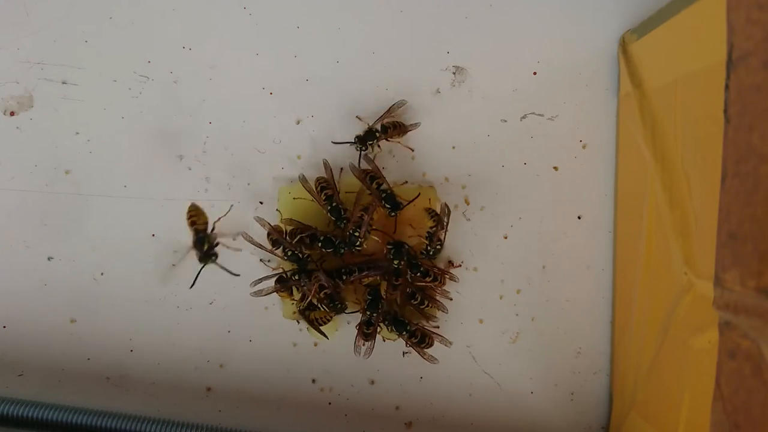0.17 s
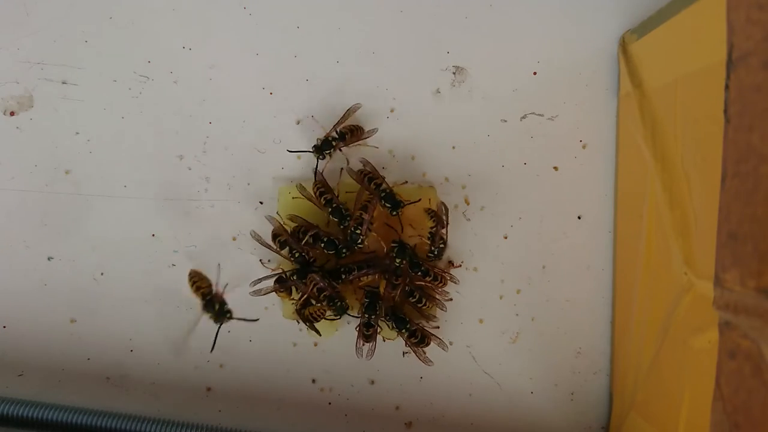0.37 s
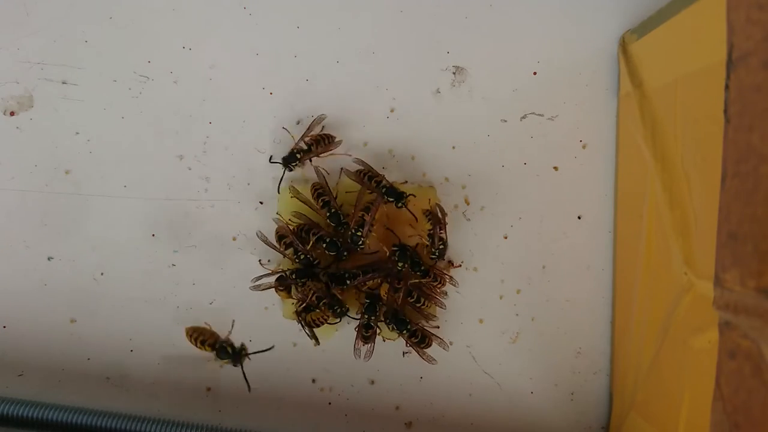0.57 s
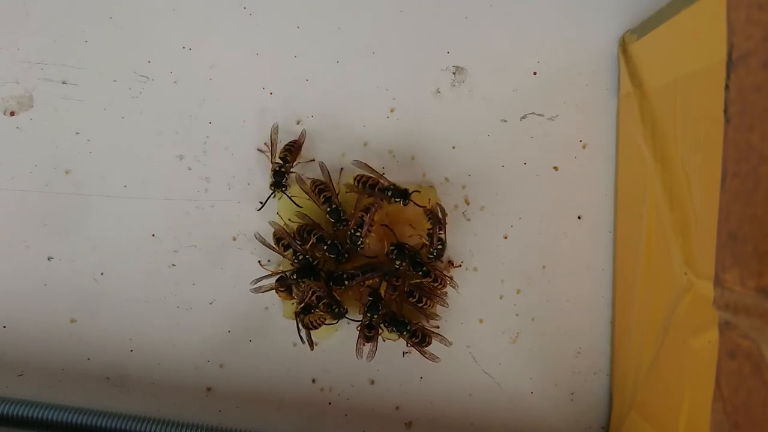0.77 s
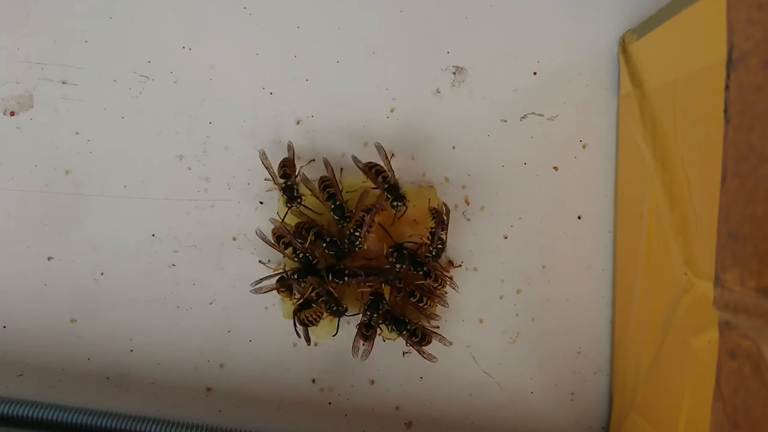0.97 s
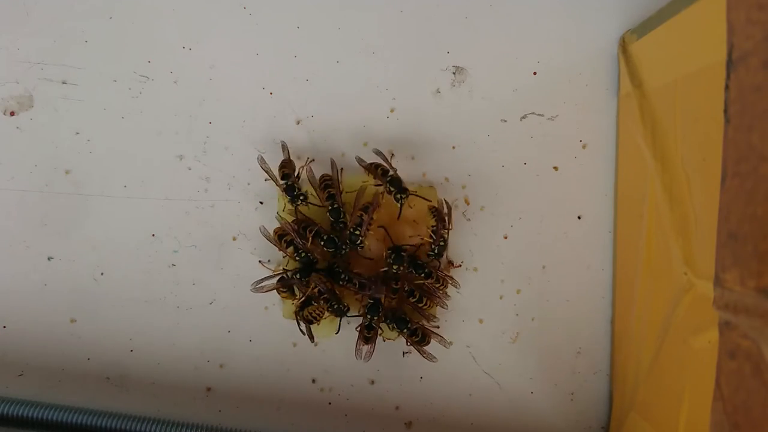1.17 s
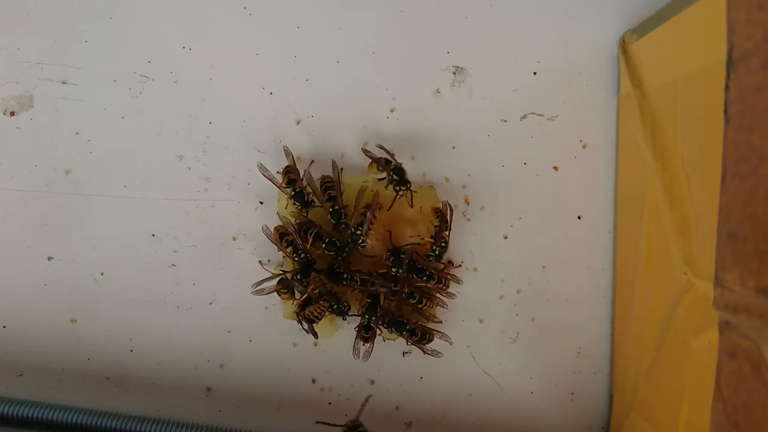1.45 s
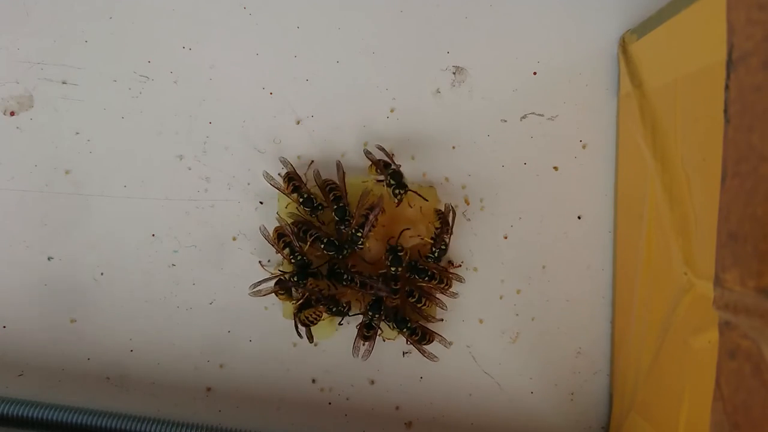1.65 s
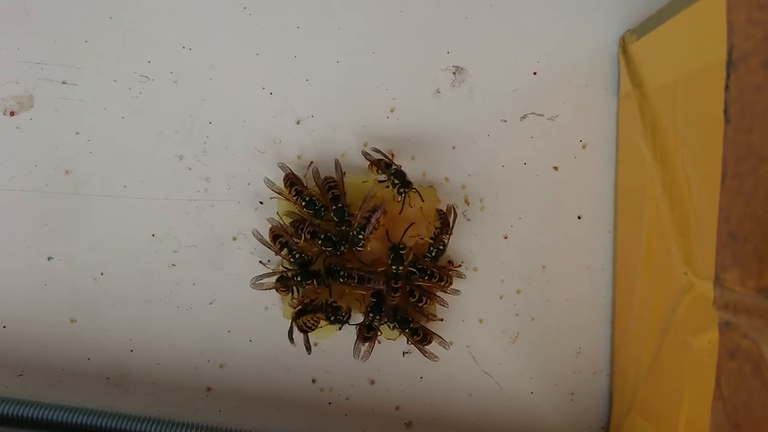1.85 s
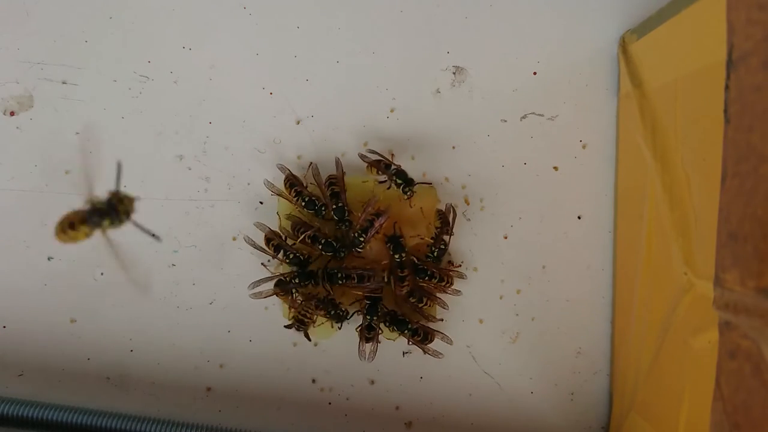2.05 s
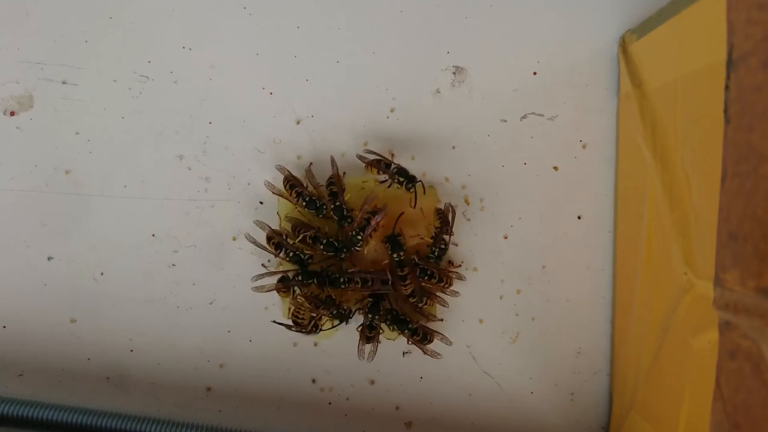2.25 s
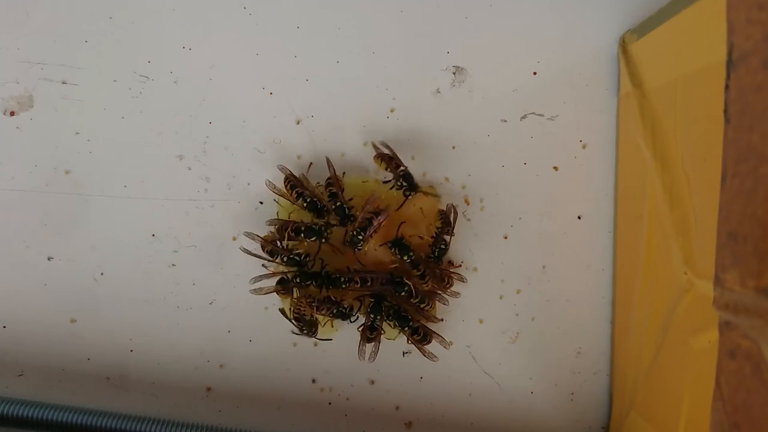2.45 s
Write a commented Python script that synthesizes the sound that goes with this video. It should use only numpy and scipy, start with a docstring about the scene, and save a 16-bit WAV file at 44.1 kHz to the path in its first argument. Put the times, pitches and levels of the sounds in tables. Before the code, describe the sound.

A wasp buzzes close on the right, swelling in short raspy surges, loudest from 0.4 to 1.3 seconds, with small gusts as it swerves. Feeding wasps rustle faintly in the first second. From about 1.5 seconds a farther wasp buzzes thinly on the left. The near buzz lowers at 1.8 seconds and fades, with two faint chirps and two soft bumps just after 2. Soft outdoor air and a low hum continue underneath.

```python
"""Outdoors, in soft air over a low hum, a far wasp buzzes briefly, left of centre. Close to the right
microphone another hovers in short surges: each wing beat gives three low tones, two snaps and puffs of
air. The feeding cluster rustles faintly in the first second, and from 0.4 s the near wasp's swerves
throw gusts at the microphone. Around 1.4 s a distant rush swells on the left and the far wasp returns.
From 1.8 s the near wasp slows its wings, then drifts away under two faint chirps and two soft bumps."""
import sys
import numpy as np
from scipy import signal
from scipy.fft import rfft, irfft
from scipy.io import wavfile

SR = 44100
rng = np.random.default_rng(int(sys.argv[2]) if len(sys.argv) > 2 else 0)


def to_wav(sig):
    """Store sig (one row per channel, or 1-D mono) as 16-bit WAV at the path in sys.argv[1].

    Samples outside -1..1 are clipped; the rate is SR.
    """
    pcm = np.clip(np.atleast_2d(sig), -1, 1) * 32767
    pcm = np.round(pcm).astype(np.int16)
    wavfile.write(sys.argv[1], SR, pcm.T)  # frames by channels


N = 114660
T = np.arange(N) / SR


def from_db(db):
    """Decibels to gain."""
    return 10 ** (np.asarray(db) / 20)


def rms_one(x):
    """Scale to rms 1."""
    return x / np.sqrt(np.mean(x ** 2) + 1e-20)


def in_time(rows):
    """Each column of a curve at every sample."""
    times, *columns = np.transpose(rows)
    return [np.interp(T, times, column) for column in columns]


def drift(rate_hz):
    """A smooth random wander of rms about 1."""
    step, settle = 40, 2000
    pole = np.exp(-2 * np.pi * rate_hz * step / SR)
    white = rng.standard_normal(N // step + settle + 2)
    slow = signal.lfilter([1], [1, -2 * pole, pole * pole], white)[settle:]
    return np.interp(np.arange(N) / step, np.arange(len(slow)), rms_one(slow))


def coloured(x, colour):
    """Shape a sound by a spectrum that falls away beyond its ends; rms 1."""
    hz, db = np.transpose(colour)
    f = np.maximum(np.arange(N + 1) * SR / (2 * N), 1)
    ends = np.minimum(f / hz[0], 1) ** 2 * np.minimum(hz[-1] / f, 1) ** 2
    gain = ends * from_db(np.interp(np.log(f), np.log(hz), db))
    return rms_one(irfft(rfft(x, 2 * N) * gain)[:N])


def noise(colour, gate=1):
    """Gated, coloured noise of rms 1."""
    return coloured(rng.standard_normal(N) * gate, colour)


def swell(peak_s, width_s):
    """A bell-shaped rise and fall; the width is its standard deviation."""
    return np.exp(-.5 * ((T - peak_s) / width_s) ** 2)


def bursts(rows):
    """The joint envelope of a table of short swells."""
    return np.sqrt(sum((from_db(db) * swell(s, width)) ** 2 for s, width, db in rows))


# Open air at the two microphones: (time [s], left level [dB], right level [dB])
AIR_LEVELS = [(0, -49, -45), (.22, -52.5, -42), (.55, -63, -41), (1.0, -58, -36), (1.45, -56, -44.5),
              (1.9, -56.5, -48.5), (2.25, -55, -48), (2.6, -56, -47.5)]
# Its spectrum on each side: (frequency [Hz], relative level [dB])
AIR_LEFT_COLOUR = [(25, -26), (50, -3), (110, 4), (220, -8), (500, -3), (900, 3), (1500, 2), (2600, -5.5),
                   (4600, -5), (6000, -20), (10000, -20), (15000, -19)]
AIR_RIGHT_COLOUR = [(25, -34), (45, 0), (100, 5), (220, 3), (500, 1), (1000, 0), (1900, -6), (2700, -15),
                    (4500, -19), (6000, -24), (15000, -29)]

def outdoor_air():
    """Soft air all around, stronger at the right microphone."""
    return from_db(in_time(AIR_LEVELS)) * np.array([noise(AIR_LEFT_COLOUR), noise(AIR_RIGHT_COLOUR)])


# Hum in the background: (time [s], left level [dB], right level [dB])
HUM_LEVELS = [(0, -46, -40), (.2, -48, -43), (.55, -62, -48), (1.0, -69, -49), (1.5, -50.5, -45),
              (1.8, -60.5, -51), (2.27, -54.5, -47), (2.6, -60, -60.5)]

def hum(pitch_hz=63.84, sway=0.0353, waver_db=3, octave_db=-10.5):
    """A wavering low hum with its octave, mostly on the right."""
    turns = np.cumsum(pitch_hz * (1 + sway * drift(12.6))) / SR
    tone = sum(from_db(db + waver_db * drift(15)) * np.sin(2 * np.pi * k * turns)
               for k, db in [(1, 0), (2, octave_db)])
    return rms_one(tone) * from_db(in_time(HUM_LEVELS))


# Flight of the wasp farther off: (time [s], wing beat [Hz], relative level [dB])
FAR_FLIGHT = [(0, 182.8, -59.5), (.4, 179.4, -79), (1.35, 180.1, -87), (1.52, 181, -60), (1.68, 172.4, -62),
              (1.77, 180.3, -60), (1.84, 177, -72), (2.04, 180.6, -63), (2.1, 175.7, -61.5),
              (2.26, 185.1, -54.5), (2.32, 172.1, -57.5), (2.4, 189.8, -56.5), (2.51, 169.1, -61.5),
              (2.6, 176.4, -64)]
# Partials of its buzz: (multiple of the wing beat, relative level [dB])
FAR_PARTIALS = [(1, -10), (2, 2.5), (4, -8.5), (5, -3), (6, -12), (7, -17)]

def far_wasp(flutter=0.01317, waver_db=2, right_db=-6.5):
    """Wings beating at a distance, left of centre: a thin buzz led by the second partial."""
    beat_hz, level_db = in_time(FAR_FLIGHT)
    turns = np.cumsum(beat_hz * (1 + flutter * drift(30.7))) / SR
    buzz = sum(from_db(db + waver_db * drift(10)) * np.sin(2 * np.pi * k * turns)
               for k, db in FAR_PARTIALS)
    return np.sqrt(2) * buzz * from_db(level_db) * from_db([[0], [right_db]])


# Relative levels of the close wing tones: (time [s], first [dB], second [dB], third [dB])
TONE_LEVELS = [(0.0, -57, -51.5, -60), (0.04, -52.5, -55, -68), (0.1, -54.5, -45, -59),
               (0.17, -46, -47, -70), (0.19, -41, -37.5, -53), (0.22, -38.5, -42.5, -48),
               (0.26, -36, -39, -61), (0.29, -36, -33.5, -47), (0.31, -37.5, -34, -46.5),
               (0.38, -32.5, -31.5, -48), (0.42, -32.5, -39, -42.5), (0.47, -23, -30, -38),
               (0.49, -28.5, -30.5, -60), (0.52, -24, -27.5, -36.5), (0.57, -35.5, -29, -38),
               (0.61, -29, -32, -51), (0.66, -29.5, -26.5, -35), (0.7, -31.5, -24, -33),
               (0.74, -35.5, -36.5, -47), (0.77, -27, -25, -32.5), (0.81, -32, -25, -33),
               (0.85, -37, -29.5, -42), (0.88, -27.5, -23, -29), (0.91, -29.5, -24.5, -32.5),
               (0.95, -38, -36.5, -48), (0.98, -27.5, -25.5, -32), (1.01, -28.5, -27, -30),
               (1.04, -25, -35, -63), (1.06, -19, -24.5, -30.5), (1.09, -30, -25, -30),
               (1.15, -35, -26, -38), (1.17, -34, -39.5, -39.5), (1.25, -35.5, -30, -42.5),
               (1.27, -32.5, -55, -40), (1.31, -30.5, -47, -37.5), (1.37, -49, -38, -55),
               (1.4, -48, -51.5, -62), (1.48, -54, -48, -60), (1.57, -49, -54.5, -61),
               (1.61, -48, -65, -58), (1.66, -44, -47, -58), (1.74, -42.5, -52.5, -58),
               (1.78, -41, -45, -47), (1.81, -51, -45.5, -54), (1.84, -45.5, -59, -58),
               (1.88, -49, -56.5, -64), (1.96, -45.5, -57, -55.5), (2.02, -50, -66, -54),
               (2.11, -57, -53, -55), (2.2, -51, -59, -57), (2.26, -58, -59, -66), (2.3, -50, -53, -62)]

def wing_tones(turns, gain_db=0.65, waver_db=0.78, sway_turns=0.075):
    """The wing beat's three lowest harmonics, each wavering in level and timing."""
    tones = 0
    for k, db in enumerate(in_time(TONE_LEVELS), 1):
        amplitude = np.sqrt(2) * from_db(gain_db + db + waver_db * drift(27))
        tones += amplitude * np.sin(2 * np.pi * (k * turns + sway_turns * drift(16.7)))
    return tones


def clicks(turns, at_turn, jitter_s=.00002, spread_db=1.5):
    """One click per wing beat, a little uneven in time and strength."""
    beats = np.arange(1, int(turns[-1]) - 1)
    timing, strength = rng.standard_normal((600, 2))[:len(beats)].T
    times = np.interp(beats + at_turn, turns, T) + jitter_s * timing
    samples = np.clip(times * SR, 0, N - 1).astype(int)
    return np.bincount(samples, from_db(spread_db * strength), N)


# Wing snaps at close range: (frequency [Hz], relative level [dB])
SNAP_COLOUR = [(450, -45), (600, 9.5), (700, 5), (900, 2.5), (1200, 4), (1750, -1.5), (2100, -13),
               (3000, -13), (4200, -20), (6000, -31.5)]
SNAP_TURN = .75   # where in the beat the stronger snap falls

def wing_snaps(turns, lead_turns=0.294, weak_db=-7, sweep_hz_per_s=3470000, gain_db=1):
    """A snap at each stroke reversal, weak then strong; its treble lags, so it sweeps upward."""
    reversals = clicks(turns, SNAP_TURN) + from_db(weak_db) * clicks(turns, SNAP_TURN - lead_turns)
    f = np.arange(N + 1) * SR / (2 * N)
    treble_lag = np.exp(-1j * np.pi * f ** 2 / sweep_hz_per_s)
    swept = irfft(rfft(reversals, 2 * N) * treble_lag)[:N]
    return from_db(gain_db) * coloured(swept, SNAP_COLOUR)


# Churned air at close range: (frequency [Hz], relative level [dB])
CHURN_COLOUR = [(90, -14), (220, -10), (450, 6.5), (850, 4), (1600, -15), (2300, -15), (3500, -14.5),
                (6000, -53)]

def wing_churn(beat_hz, puffs, cruise_hz=174.7, cruise_db=-10.5, db_per_hz=0.5357):
    """Puffs of air that churn more as the wings slow."""
    return from_db(cruise_db + db_per_hz * (cruise_hz - beat_hz)) * noise(CHURN_COLOUR, puffs)


# Wing hiss at close range: (frequency [Hz], relative level [dB])
HISS_COLOUR = [(1500, -15), (3000, 14.5), (4200, -25.5), (6000, -3), (7200, 6.5), (10000, 0.5),
               (13000, 2.5), (15700, 6)]

def wing_hiss(puffs, crackle_db=2, gain_db=3):
    """The bright, crackling top of each puff of air."""
    return from_db(gain_db) * noise(HISS_COLOUR, puffs * from_db(crackle_db * drift(500)))


# Flight of the wasp at the right microphone: (time [s], wing beat [Hz])
NEAR_BEAT = [(0.0, 178.1), (0.04, 172.3), (0.12, 179.9), (0.16, 161), (0.2, 176.9), (0.24, 171.6),
             (0.26, 164.0), (0.29, 176), (0.32, 181.6), (0.38, 179.3), (0.4, 166), (0.43, 160.6),
             (0.46, 182.4), (0.48, 173.2), (0.56, 178.7), (0.61, 167.1), (0.68, 181.6), (0.7, 181.1),
             (0.74, 155), (0.77, 176.7), (0.81, 174.4), (0.84, 161.3), (0.87, 181.2), (0.91, 180),
             (0.95, 155.6), (0.98, 177.4), (1.01, 174.8), (1.04, 163.5), (1.08, 176.3), (1.12, 163.5),
             (1.14, 177.5), (1.17, 165.9), (1.21, 179.4), (1.28, 162.8), (1.31, 173.4), (1.38, 177.8),
             (1.4, 165.6), (1.43, 169.4), (1.49, 175.5), (1.58, 169.6), (1.79, 171.5), (1.83, 157.5),
             (1.92, 149.7), (2.13, 155.1), (2.16, 151.9), (2.3, 149.3)]
# Force of its stroke, as relative levels: (time [s], rasp [dB], hiss [dB])
STROKE_FORCE = [(0.0, -57, -77), (0.014, -60, -71.5), (0.084, -54.5, -69), (0.11, -55, -68),
                (0.254, -49, -60.5), (0.296, -43.5, -60), (0.338, -43.5, -56.5), (0.422, -45, -62.5),
                (0.438, -72, -74), (0.448, -44, -54), (0.57, -37.5, -60), (0.628, -55, -57.5),
                (0.64, -38.5, -54.5), (0.708, -36, -54), (0.73, -68, -65.5), (0.772, -33.5, -50.5),
                (0.798, -39, -57), (0.814, -35.5, -51.5), (0.846, -49, -55.5), (0.872, -34, -53),
                (0.894, -37.5, -54.5), (0.926, -39.5, -52.5), (0.936, -64, -74), (0.952, -59, -77),
                (0.972, -37, -55.5), (1.078, -39, -55), (1.184, -49, -64.5), (1.242, -43, -57),
                (1.258, -59.5, -66.5), (1.37, -50, -63.5), (1.402, -74, -79), (1.46, -57, -65.5),
                (1.528, -66, -81), (1.544, -58.5, -65.5), (1.608, -62, -80), (1.614, -66.5, -73),
                (1.73, -57, -66), (1.75, -67, -72), (1.794, -51.5, -62), (1.856, -75, -77),
                (1.878, -83, -86), (1.9, -80, -79)]
PUFF_DEPTH_DB, RASP_OVER_HISS_DB = 4, 11.5
LEAVE_S, LEAVE_DB_PER_S = 2.122, 45

def near_wasp(flutter=.003, left_db=-54, right_db=5.5):
    """One wing beat drives tones, snaps and puffs of air, close on the right until the wasp leaves."""
    beat_hz, = in_time(NEAR_BEAT)
    rasp_db, hiss_db = in_time(STROKE_FORCE)
    turns = np.cumsum(beat_hz * (1 + flutter * drift(49.4))) / SR
    angle = 2 * np.pi * (turns - SNAP_TURN)   # the puffs peak with the stronger snap
    puffs = from_db(PUFF_DEPTH_DB * (np.cos(angle) + np.cos(2 * angle)) / np.sqrt(2))
    tones = wing_tones(turns)
    snaps = wing_snaps(turns)
    rasp_gain = from_db(np.maximum(rasp_db, hiss_db + RASP_OVER_HISS_DB))
    rasp = rasp_gain * (wing_churn(beat_hz, puffs) - snaps)
    hiss = from_db(hiss_db) * wing_hiss(puffs)
    leaving = from_db(-LEAVE_DB_PER_S * np.maximum(T - LEAVE_S, 0))
    return (tones + rasp + hiss + swerve_gusts(puffs)) * leaving * from_db([[left_db], [right_db]])


# Rustles of the feeding cluster: (time [s], width [s], left level [dB])
RUSTLES = [(0.065, 0.055, -51), (.23, 0.054, -52), (0.522, 0.17, -58.5), (0.802, 0.17, -58)]
# Their spectrum: (frequency [Hz], relative level [dB])
RUSTLE_COLOUR = [(1200, -8), (2400, -6), (3300, -2), (4600, -2), (5600, -15.5), (7000, -10.5), (9000, -48)]

def cluster(grain_db=2, right_db=3):
    """Crawling wasps make brief grainy rustles, a little right of centre."""
    sides = [from_db(db) * noise(RUSTLE_COLOUR, from_db(grain_db * drift(92))) for db in (0, right_db)]
    return bursts(RUSTLES) * np.array(sides)


# Swerves of the near wasp: (time [s], width [s], relative level [dB])
SWERVES = [(.425, 0.015, -45), (.46, 0.013, -36), (.605, 0.021, -40.5), (.84, 0.02, -39),
           (1.05, 0.03, -37.5), (1.13, 0.029, -44.5), (1.2, .02, -46), (1.275, 0.034, -48)]
# Spectrum of their gusts: (frequency [Hz], relative level [dB])
GUST_COLOUR = [(110, -8), (220, -8), (500, 4), (700, 4), (880, 12.5), (1100, -1), (2000, -26)]

def swerve_gusts(puffs):
    """Each swerve throws a rough gust at the microphone, pulsing with the wings."""
    return bursts(SWERVES) * noise(GUST_COLOUR, puffs)


# A rush in the distance: (frequency [Hz], relative level [dB])
RUSH_COLOUR = [(400, -42), (750, 7.5), (1000, 6.5), (1500, -12), (3000, -13)]

def distant_rush(peak_db=-52.5):
    """One slow swell of noise, on the left microphone only."""
    rush = from_db(peak_db) * swell(peak_s=1.4, width_s=0.35) * noise(RUSH_COLOUR)
    return rush * np.array([[1], [0]])


# Chirps in the background: (time [s], width [s], right level [dB])
CHIRPS = [(2.075, 0.024, -63), (2.21, 0.035, -65)]
# Their spectrum: (frequency [Hz], relative level [dB])
CHIRP_COLOUR = [(3600, -18), (4300, -2), (4500, 2), (4700, -7), (5300, -30)]

def chirps(left_db=-3):
    """Two faint chirps of high, narrow-band noise, a little right of centre."""
    return bursts(CHIRPS) * noise(CHIRP_COLOUR) * from_db([[left_db], [0]])


# Bumps in the background: (time [s], width [s], right level [dB])
BUMPS = [(2.11, .02, -43.5), (2.27, 0.027, -44.5)]
# Their spectrum: (frequency [Hz], relative level [dB])
BUMP_COLOUR = [(60, -21), (105, -8), (135, -3), (200, -25)]

def bumps(left_db=-15):
    """Two soft bumps of low noise, well to the right."""
    return bursts(BUMPS) * noise(BUMP_COLOUR) * from_db([[left_db], [0]])


def scene():
    """Both wasps, the cluster and the background at the left and right microphones."""
    wasps = near_wasp() + far_wasp() + cluster()
    return wasps + chirps() + bumps() + hum() + distant_rush() + outdoor_air()


def record(dry):
    """A steep low-pass cuts the top treble of both microphones."""
    cutoff_hz = 15850
    return signal.sosfilt(signal.ellip(12, .1, 80, cutoff_hz, fs=SR, output="sos"), dry)


dry = scene()
out = record(dry)
to_wav(out)
```